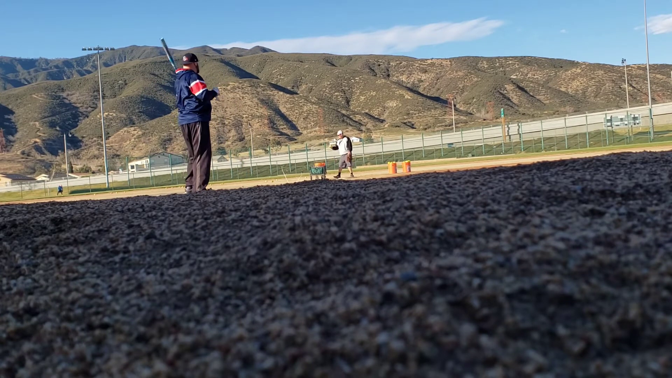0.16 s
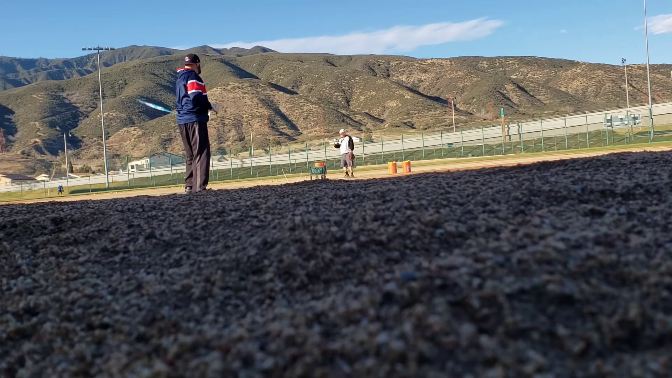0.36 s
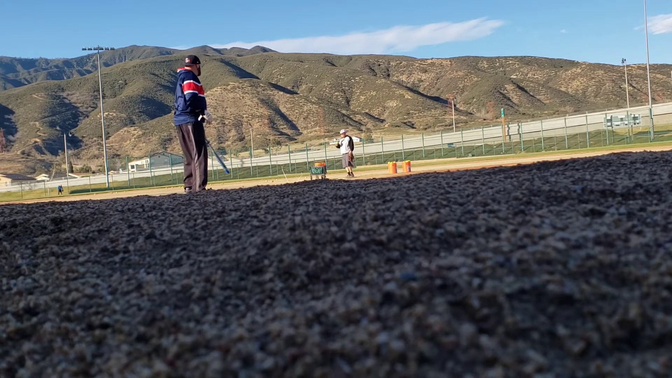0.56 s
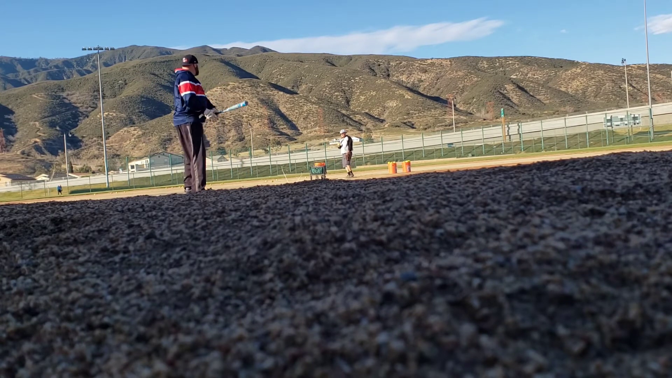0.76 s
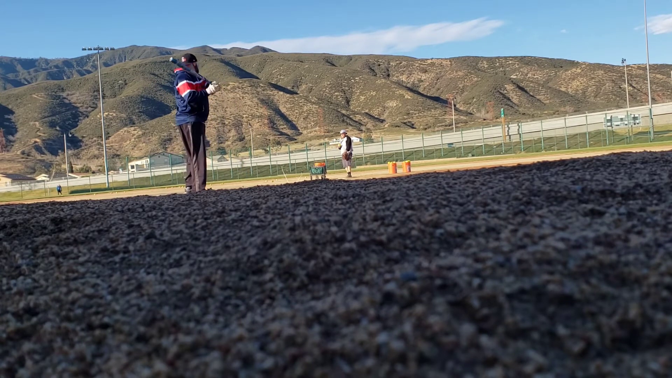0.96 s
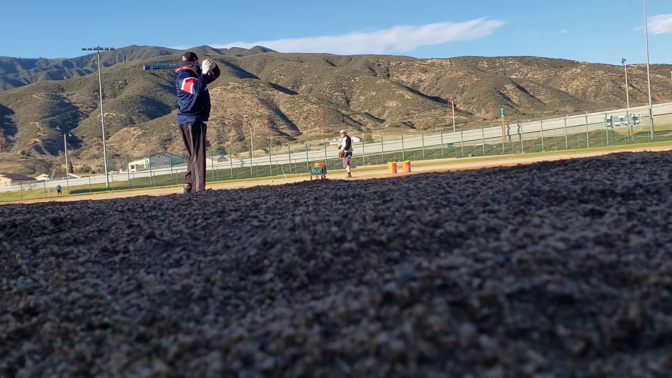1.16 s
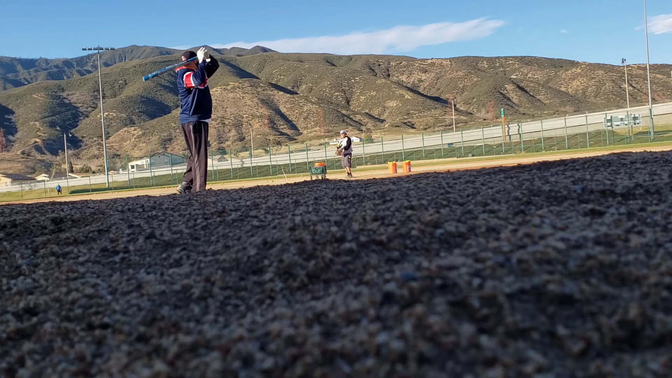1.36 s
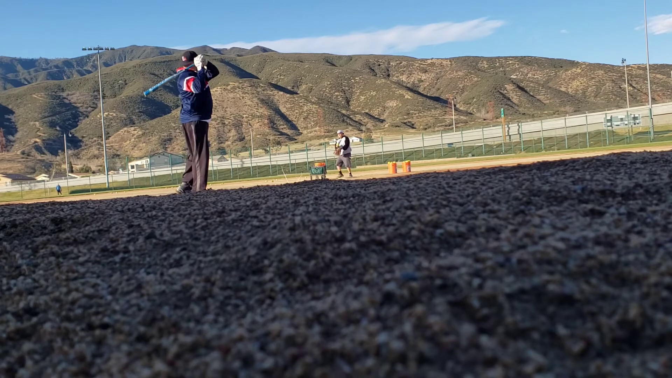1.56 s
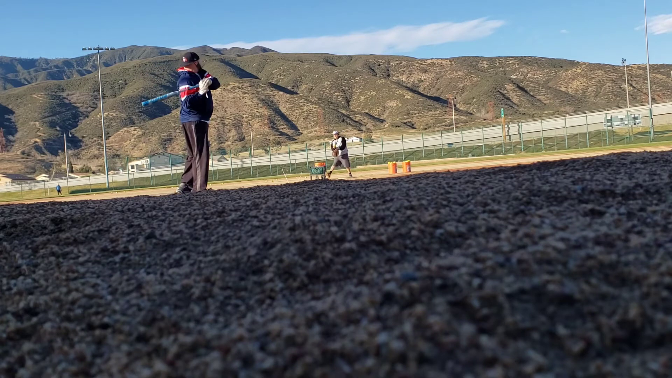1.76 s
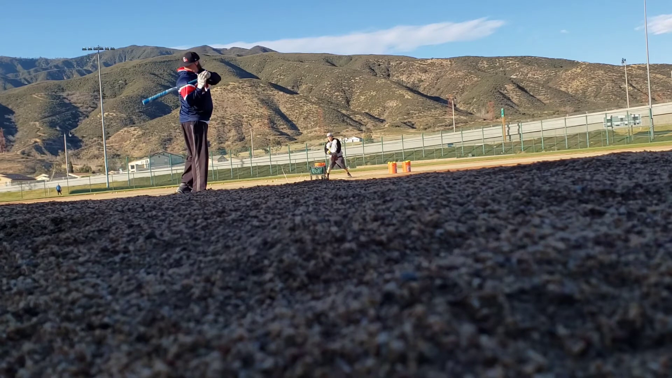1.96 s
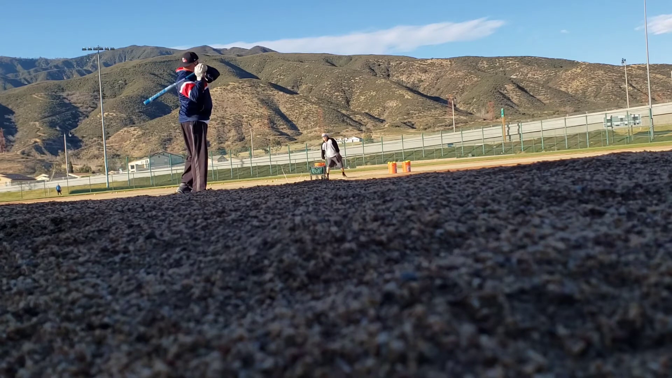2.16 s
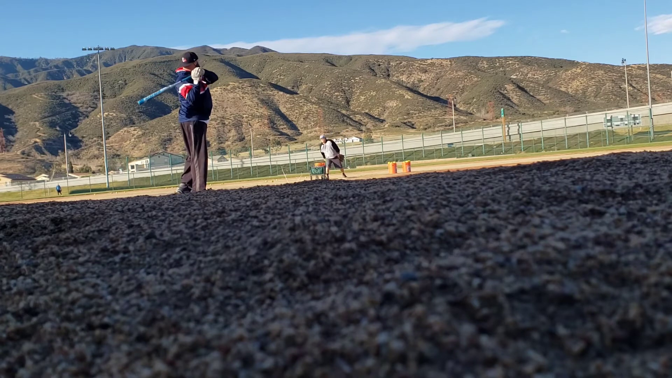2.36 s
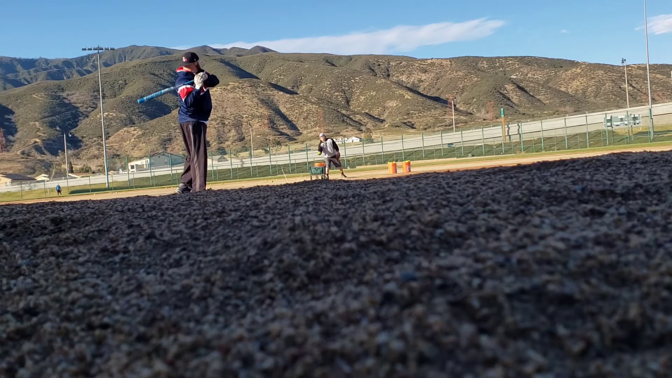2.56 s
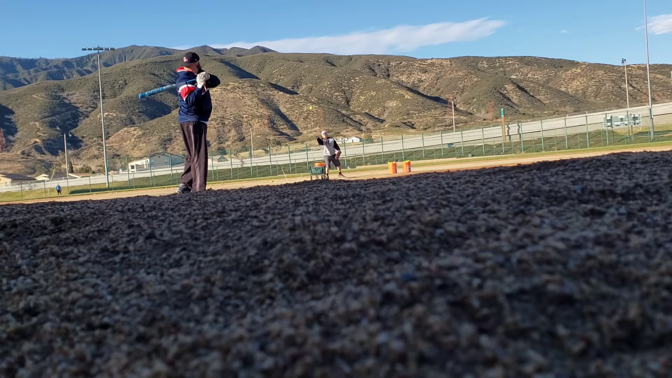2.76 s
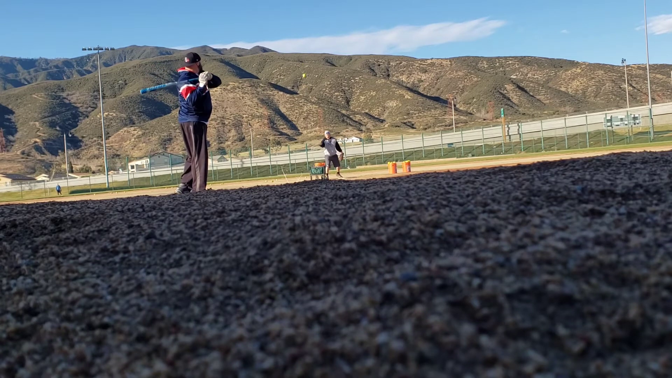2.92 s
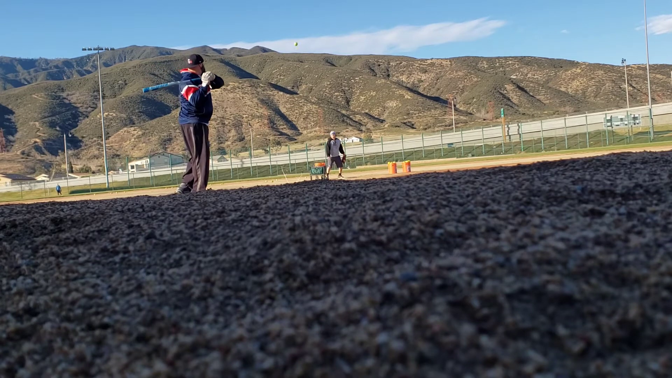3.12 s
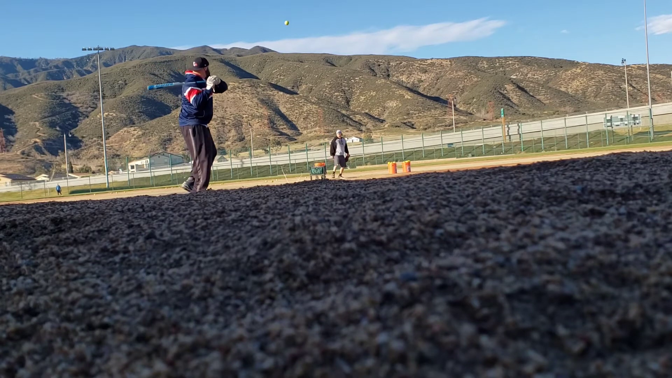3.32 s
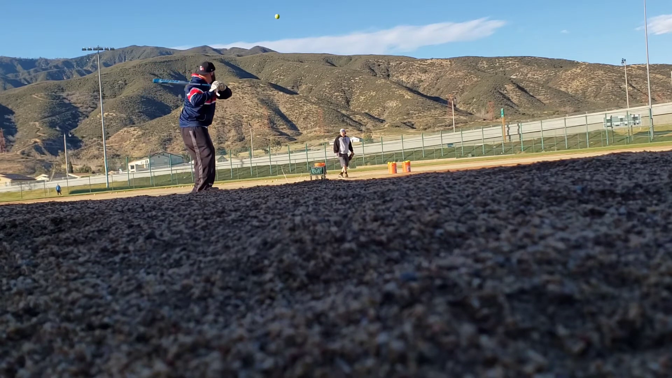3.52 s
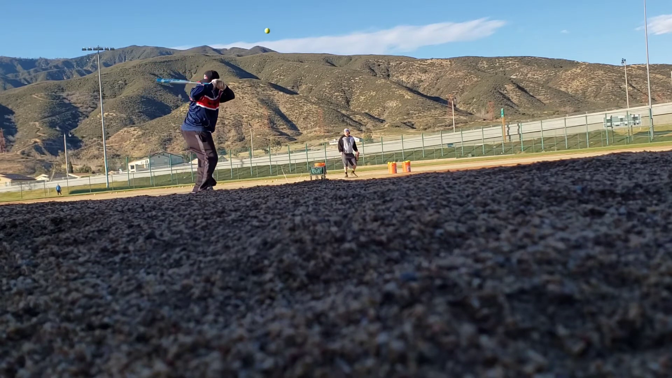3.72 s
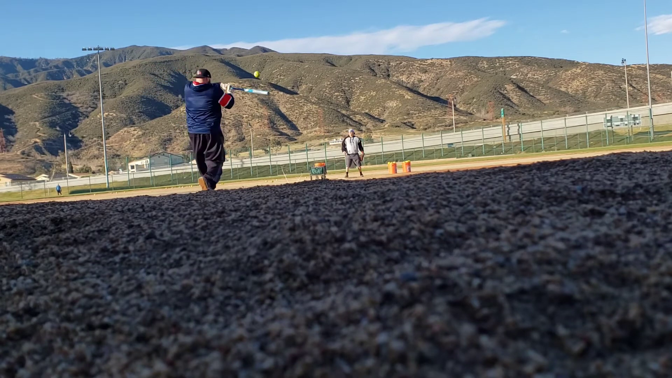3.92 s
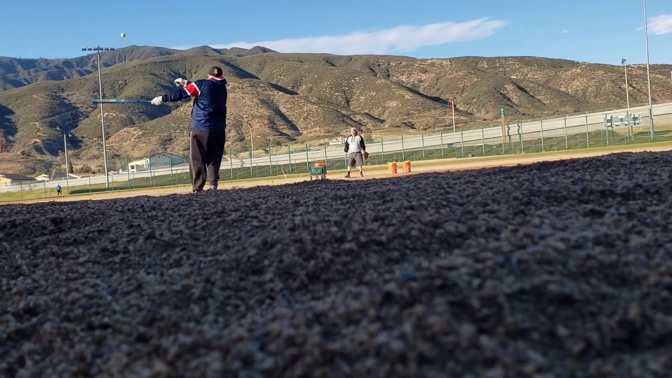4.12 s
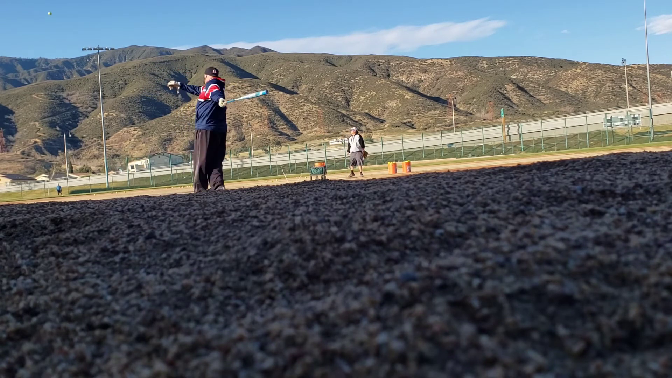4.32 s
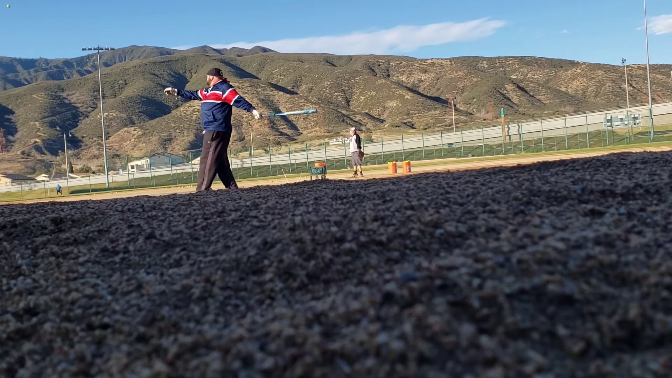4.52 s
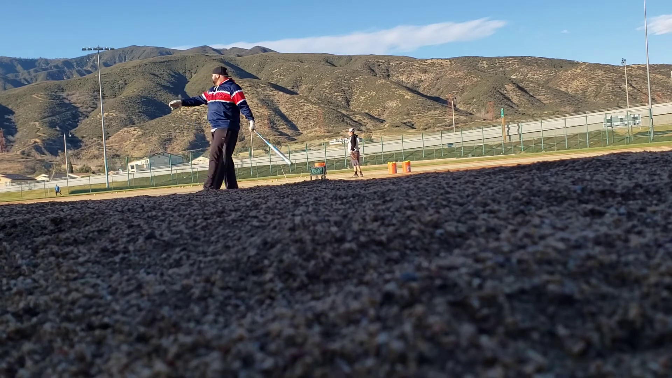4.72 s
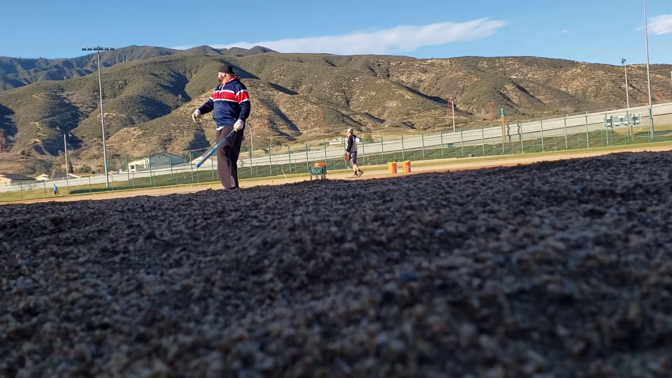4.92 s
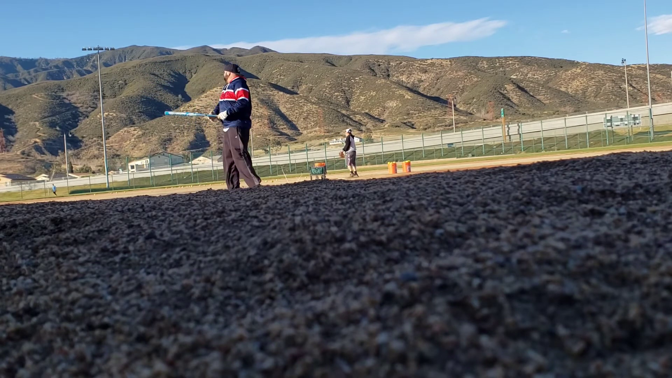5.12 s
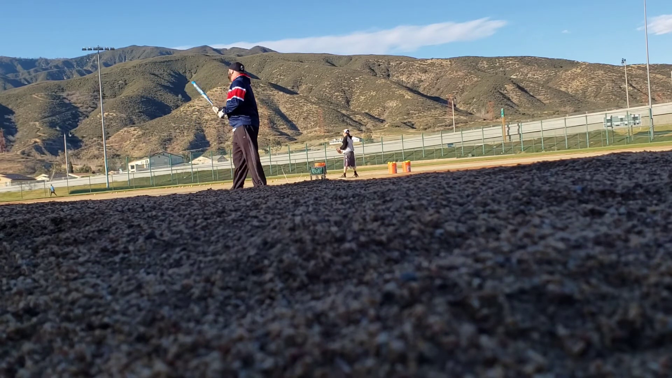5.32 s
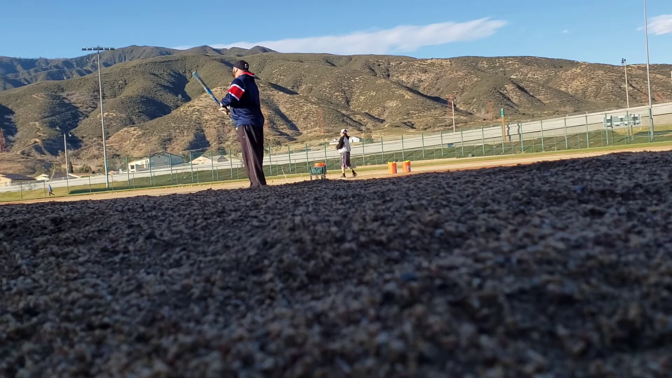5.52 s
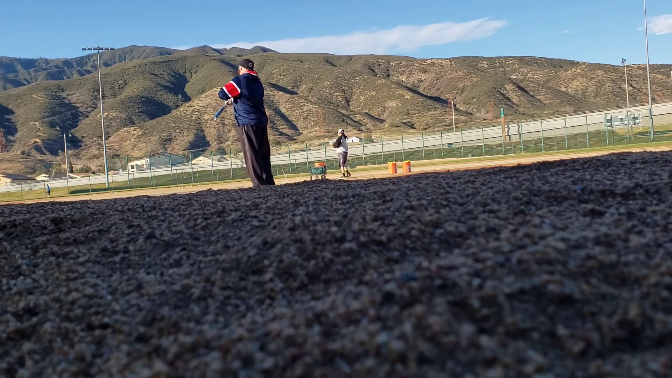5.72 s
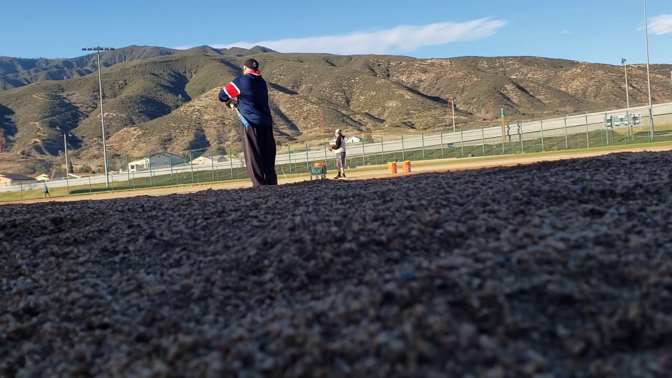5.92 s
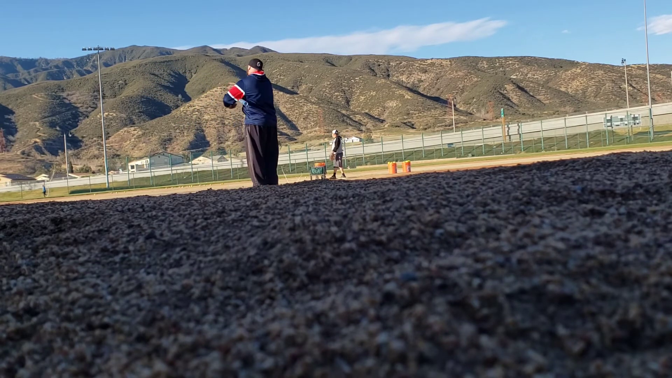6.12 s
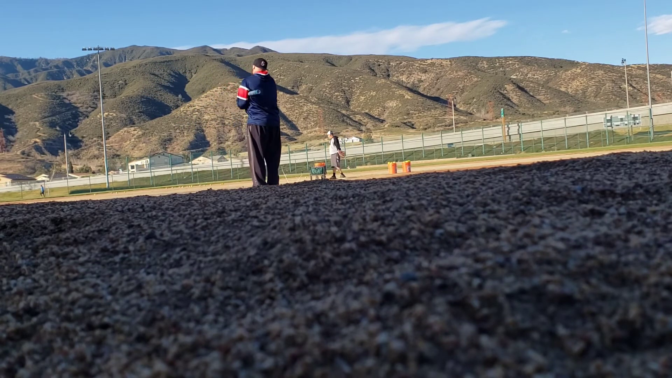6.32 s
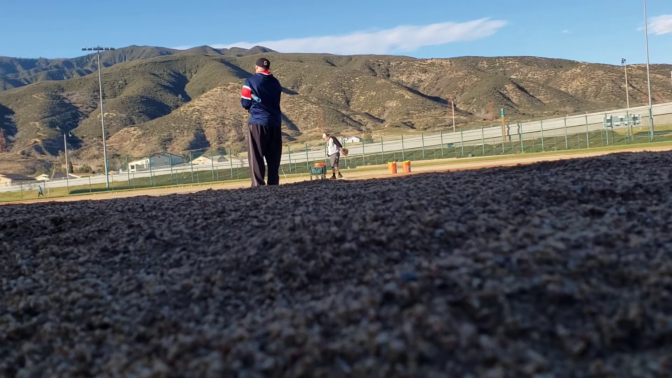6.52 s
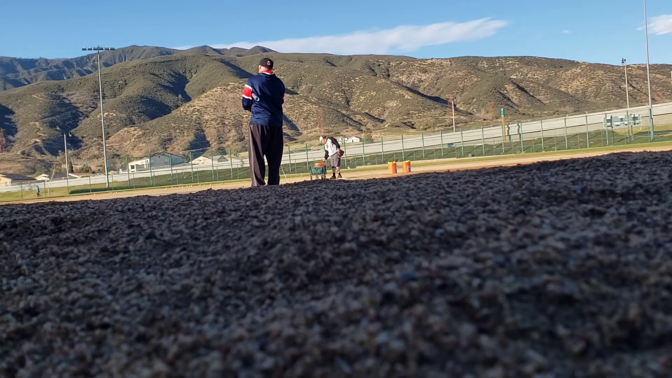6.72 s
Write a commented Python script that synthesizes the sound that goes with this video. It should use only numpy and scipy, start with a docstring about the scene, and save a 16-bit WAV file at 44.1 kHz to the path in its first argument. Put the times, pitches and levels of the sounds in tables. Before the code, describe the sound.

For the first three seconds there is only a quiet, steady low rumble of distant traffic with muffled tyre roar, faint hiss and wavering engine drone. A vehicle's tyre hum swells gently near 1.7 s, and a truck engine eases off around 2 s; brief engine notes surface at 2 and 2.9 s. From 2.9 to 3.9 s, soft low puffs of breeze buffet the microphone, stronger on the left. Shoes scrape gritty dirt at 3.3 s, with faint scuffs and jacket swish just before the blow. At 4.04 s a bat strikes the ball: one huge, dry metallic crack with a very short ping near 1.1 kHz, an immediate backstop slap, clattering fence returns, wall echoes around 4.65 s and a thin fading outdoor tail. The background is suddenly ducked; very faint cloth swishes reach 4.8 s. After about 6.1 s the rumble gradually rises again until 7 s.

```python
"""A bat meets a softball on an open field, heard on a two-port microphone on the ground behind the batter.
The barrel pings from ringing modes and a noise crack; a backstop one metre behind the microphone, posts,
slopes, a side fence and walls 100 m off answer. Shoes scuff and a jacket swishes as shaped noise.
Distant traffic is noise and low engine tones, with a truck easing off and a car cruising by; a breeze
puffs at the microphone, and the blow makes the gain control duck for about two seconds."""
import sys
import numpy as np
from scipy import signal
from scipy.fft import rfft, irfft, next_fast_len
from scipy.io import wavfile
from scipy.ndimage import uniform_filter1d, minimum_filter1d, map_coordinates

SR = 44100
rng = np.random.default_rng(int(sys.argv[2]) if len(sys.argv) > 2 else 0)


def master_out(mix):
    """Clip the mix to full scale and print it as 16-bit PCM to the path in sys.argv[1]."""
    frames = np.transpose(np.atleast_2d(mix))
    ceiling = np.clip(frames, -1, 1)
    pcm = np.round(ceiling * 32767).astype(np.int16)
    wavfile.write(sys.argv[1], SR, pcm)


N = 303408

# The two microphone ports under sound from all around.
# Each row: frequency in Hz, coherence between the ports (limited to 0..1 in use).
PORT_COHERENCE = [(35, 0.9), (65, 0.9), (130, 1.34), (290, 0.54), (480, 1), (750, .5), (1400, 0.56),
                  (3100, 0.06), (7000, -0.5)]
# Each row: frequency in Hz, phase by which the left port leads in radians.
PORT_LEAD = [(100, 0.5), (380, -0.38), (650, -2), (1250, -3), (1900, -6), (2500, -6), (3400, -8.5)]
# Each row: frequency in Hz, left level over right in dB.
PORT_BALANCE = [(35, 2), (70, 2), (200, 1.5), (700, 0), (2400, 0.5), (6500, 5), (15000, 0.5)]
# The microphone's own hiss. Each row: frequency in Hz, relative density in dB per Hz.
HISS_SPECTRUM = [(500, -10.5), (3000, 0.5), (5200, -0.5), (6500, 3), (7800, -4), (9200, -6.5), (12000, 1.5),
                 (14000, 1), (16000, -5.5)]

# Distant traffic: its rumble, its tyre roar, and the tyre hum of one vehicle.
# Each row: frequency in Hz, relative density in dB per Hz.
RUMBLE_SPECTRUM = [(20, -27.5), (30, -19.5), (40, -7), (62, 0), (85, -2.5), (120, -4.5), (160, -10.5),
                   (240, -16.5), (320, -26), (600, -50.5), (2000, -110)]
TYRE_SPECTRUM = [(120, -20.5), (300, -0.5), (430, -5), (560, 0.5), (800, -1.5), (1100, -7.5), (1500, -14),
                 (1900, -20), (2400, -29), (3100, -40), (4500, -56), (9000, -91)]
TREAD_SPECTRUM = [(200, -30), (350, -3), (430, -6), (520, 0), (640, -6), (850, -9), (1300, -30),
                  (3000, -70)]
BUSIEST_S, RUMBLE_DB, TYRES_DB = 2.4, -34, -47
THINNING_DB_PER_S = 0.63  # before and after the busiest moment
PASS_S, PASS_DB, PASS_WIDTH_S = 1.7, -53, .6  # the tyre hum: nearest moment, level then, half-width

# Engine orders of the truck and the car. Each row: multiple of the firing rate, relative level in dB.
TRUCK_ORDERS = [(1, -4.5), (2, 0.5), (3, -21.5)]
CAR_ORDERS = [(1, -1.5), (2, -11.5), (3, -22.5)]
EASE_OFF_S, SETTLE_S = 1.95, 0.42  # the truck eases off; time constant of its load
PULL_DB, COAST_DB = -40, -49.5  # under load and coasting, before the orders
TRUCK_HZ, CLIMB_HZ_PER_S, SAG_HZ_PER_S = 64.8, .6, .7  # firing rate at its top, rise before, fall after
CAR_HZ, CAR_NEAREST_S = 84, 4.7
CAR_DB, CAR_FADE_DB_PER_S = -39.5, 1.63  # level when nearest, before the orders; loss either side

# Notes of far engines. Each row: middle in seconds, pitch in Hz, level in dB,
# time either side to fall to 1/e in seconds.
SURGES = [(2.026, 380, -49.5, .09), (2.92, 236, -45, 0.093), (6.749, 118, -42, .39)]

# Puffs of breeze. Each row: middle in seconds, level in dB before the lee of the right port,
# time either side to fall to 1/e in seconds.
PUFFS = [(2.95, -38, .08), (3.12, -34.5, 0.089), (3.292, -36, 0.055), (3.57, -36, .04), (3.73, -31, .05),
         (3.84, -28.5, .055)]
# Their buffeting. Each row: frequency in Hz, relative density in dB per Hz.
BUFFET_SPECTRUM = [(15, -16), (30, -6.5), (48, 0), (75, -1), (110, -6.5), (170, -15.5), (260, -28),
                   (500, -50), (1500, -100)]
LEE_DB = -8.5  # the sheltered right port against the left

# What far walls, slopes, posts and rails, the side fence and the backstop return, and what survives
# a long way through the air. Each row: frequency in Hz, relative level in dB.
WALL_COLOUR = [(500, -11), (1080, -2.5), (1250, 1), (1550, -1), (2000, -11), (3500, -17), (7000, -24),
               (14000, -45)]
SLOPE_COLOUR = [(500, -6.5), (1100, 2.5), (1700, 3), (3000, 0), (4200, -14), (6500, -8.5), (7600, -4),
                (10000, -12), (16000, -22)]
POST_COLOUR = [(500, -14.5), (1100, -8.5), (2000, -2), (4000, 0), (5000, -7), (7500, -4), (10000, -11),
               (16000, -22)]
FENCE_COLOUR = [(500, -8), (1200, 0.5), (1800, -7), (3200, -2), (4300, -8), (7500, -14.5), (13000, -30)]
BACKSTOP_COLOUR = [(400, -4), (1100, -2.5), (1700, -5.5), (3500, -2.5), (7000, -0.5), (9500, 1),
                   (13000, -3.5)]
DISTANCE_COLOUR = [(500, -6), (1100, 3.5), (1700, 4), (3000, 0.5), (7500, -2), (10000, -9), (16000, -19.5)]
# Far walls, 100 and 111 m off. Each row: delay in seconds, level before colouring in dB.
WALL_ECHOES = [(.58, -38), (.648, -45.5)]
# Stretches of side fence, about 15 to 54 m off.
# Each row: delay in seconds, level before colouring in dB, pitch of the returned ping in Hz.
FENCE_ECHOES = [(.088, -37, 1183), (.114, -33, 1174), (.165, -36, 1156), (.184, -38, 1160),
                (.208, -40.5, 1195), (0.3133, -37, 1194)]
PING_DB, PING_T60 = -2.5, .16  # that ping's level among the bat modes, its decay time in s
# The crack as the field scatters it. Each row: frequency in Hz, relative density in dB per Hz.
FIELD_SPECTRUM = [(240, -21.5), (400, -8.5), (700, -4), (1130, -0.5), (1350, -3), (1730, -3), (2300, -9),
                  (4300, -13), (5000, -21), (7500, -19), (9000, -27), (12300, -22.5), (16000, -26)]
# How the field's answer dies. Each row: frequency in Hz, time to fall 60 dB in seconds.
FIELD_T60 = [(500, 0.38), (1100, 0.43), (1800, 0.36), (3000, 0.36), (7000, 0.36), (14000, 0.31)]

# Shoes scraping the dirt. Each row: peak in seconds, level in dB, time to fall 60 dB in seconds,
# level of the sand kicked up in dB.
SCUFFS = [(3.275, -65, 0.21, -80), (3.3, -56, 0.36, -63.5), (3.711, -69, 0.35, -72),
          (3.932, -67, .3, -80.5), (3.975, -61.5, .3, -73)]
# The jacket swishing with the arms.
# Each row: peak in seconds, level in dB, time to fall 60 dB in seconds.
RUSTLES = [(3.345, -62, .35), (3.41, -62.5, .42), (3.925, -58, 0.24), (3.943, -63, 0.17),
           (3.976, -58.5, .2), (4.03, -57.5, 0.14), (4.375, -57.5, .22), (4.425, -65, .1),
           (4.512, -62.5, .2), (4.585, -66.5, .3), (4.655, -69, .25), (4.71, -60.5, .17), (4.737, -65, .11),
           (4.765, -62, .24)]
# Grit under the shoes, fine sand, jacket cloth. Each row: frequency in Hz, relative density in dB per Hz.
DIRT_SPECTRUM = [(300, -29), (1200, -4.5), (2200, -2.5), (2800, -5.5), (3900, 2.5), (4800, -11),
                 (7500, -15), (9200, -26), (12500, -24.5), (16000, -29)]
SAND_SPECTRUM = [(1500, -20), (3000, -3), (4000, 3), (4800, -7), (7500, -0.5), (9200, -12), (12500, -7),
                 (16000, -16)]
CLOTH_SPECTRUM = [(400, -10.5), (1300, 2.5), (2200, 4.5), (3200, -1.5), (4000, -6.5), (4600, -23),
                  (7500, -24), (10000, -40)]
SAND_FALL_S = .022  # the sand lands this long after the scrape
SCUFF_RISE, RUSTLE_RISE = 0.071, 0.15  # build-up as a share of the decay time

# The blow: hoop mode of the barrel, short pop of the ball, higher barrel modes, contact click, low thump.
# Each row: frequency in Hz, relative level in dB, time to fall 60 dB in seconds.
BAT_MODES = [(1095.6, -2.5, 0.053), (1105, 5.5, .0062), (1660, 1.47, .0052), (2676, -25, 0.034),
             (3190, -29.5, 0.043), (3852, -28, 0.035), (4135, -15.5, .009), (6560, -20.5, 0.013),
             (7607, -29.5, 0.045), (8900, -20, .003), (13610, -6, 0.0032), (228, -31, 0.018)]
HIT_S = 4.0407  # the moment of contact

TOP_HZ = 16000  # upper band limit


def amp(db):
    """Amplitude for a level in dB."""
    return 10 ** (np.asarray(db) / 20)


def unit(x):
    """x scaled to rms 1."""
    return x / np.sqrt(np.mean(x ** 2) + 1e-20)


def clock():
    """The time of every sample in seconds."""
    return np.arange(N) / SR


def along(points, hz):
    """Values of (Hz, value) points, interpolated on a log frequency axis."""
    f, v = np.transpose(points)
    return np.interp(np.log(hz + 1), np.log(f + 1), v)


def wobble(rate):
    """A smooth random curve, rate knots a second."""
    knots = rng.standard_normal(int(N * rate / SR) + 4)
    return map_coordinates(knots, [clock() * rate])


def filtered(x, response):
    """x times a complex response of frequency."""
    m = next_fast_len(N + SR // 2)
    return irfft(rfft(x, m) * response(np.fft.rfftfreq(m, 1 / SR)), m)[..., :N]


def rush(spectrum):
    """Noise of rms 1 from all around: shared and opposed parts set how alike the ports are."""
    half = np.array([[.5], [-.5]])

    def blend(hz):
        turn = np.arccos(np.clip(along(PORT_COHERENCE, hz), 0, 1)) / 2
        return amp(along(spectrum, hz)) * [np.cos(turn), np.sin(turn)]

    def ports(hz):
        return amp(half * along(PORT_BALANCE, hz)) * np.exp(1j * half * along(PORT_LEAD, hz))

    mid, side = filtered(rng.standard_normal((2, N)), blend)
    return unit(filtered(np.array([mid + side, mid - side]), ports))


def fade(t, t60):
    """Exponential decay from t = 0 on."""
    return np.exp(-np.log(1000) * np.maximum(t, 0) / t60)


def swell(s, rise, t60):
    """An envelope that climbs to 1 at time s and dies away."""
    t = clock() - s
    return np.clip(1 + t / rise, 0, 1) * fade(t, t60)


def puff(s, width):
    """A bell-shaped envelope around time s, down to 1/e at width either side."""
    return np.exp(-((clock() - s) / width) ** 2)


def arrival(blow, colour, delay, skew):
    """The blow by one path: coloured, late, and at the left port skew seconds before the right."""
    lag = delay + skew * np.array([[-.5], [.5]])
    return filtered(blow, lambda hz: amp(along(colour, hz)) * np.exp(-2j * np.pi * hz * lag))


def microphone_hiss():
    """The microphone's own steady noise."""
    return amp(-79.5) * rush(HISS_SPECTRUM)


def engine(hz, db, orders, drift):
    """A far engine: only its lowest orders carry, wavering in pitch and level."""
    phase = 2 * np.pi * np.cumsum(hz * (1 + drift * wobble(6))) / SR
    tones = 0
    for k, level in orders:
        wavering = amp(db + level + 2.8 * wobble(5))
        tones = tones + wavering * np.sin(k * phase + rng.uniform(0, 2 * np.pi))
    return np.sqrt(2) * tones


def surges():
    """Now and then one wavering note of a far engine carries over the traffic."""
    return sum(engine(hz, db, [(1, 0)], drift=.025) * puff(s, width) for s, hz, db, width in SURGES)


def passing():
    """One vehicle's tyre hum rises over the rest and sinks back."""
    return amp(PASS_DB) * rush(TREAD_SPECTRUM) / (1 + ((clock() - PASS_S) / PASS_WIDTH_S) ** 2)


def truck():
    """The engine gains speed under load, then eases off: it goes quiet and slowly runs down."""
    before = np.maximum(EASE_OFF_S - clock(), 0)
    after = np.maximum(clock() - EASE_OFF_S, 0)
    hz = TRUCK_HZ - CLIMB_HZ_PER_S * before - SAG_HZ_PER_S * after
    load = np.exp(-after / SETTLE_S)
    return engine(hz, COAST_DB + (PULL_DB - COAST_DB) * load, TRUCK_ORDERS, drift=.005)


def car():
    """An engine at cruising speed, loudest where it is nearest."""
    db = CAR_DB - CAR_FADE_DB_PER_S * np.abs(clock() - CAR_NEAREST_S)
    return engine(CAR_HZ, db, CAR_ORDERS, drift=0.0203)


def traffic():
    """Rumble and tyre roar swell and ebb together, joined by single vehicles."""
    flow_db = -THINNING_DB_PER_S * np.abs(clock() - BUSIEST_S)
    rumble = amp(RUMBLE_DB + flow_db + 0.81 * wobble(5.0)) * rush(RUMBLE_SPECTRUM)
    tyres = amp(TYRES_DB + flow_db + 0.62 * wobble(4.3)) * rush(TYRE_SPECTRUM)
    return rumble + tyres + truck() + car() + passing() + surges()


def breeze():
    """Each puff tumbles over the two ports separately, and hardest over the left."""
    force = sum(amp(db) * puff(s, width) for s, db, width in PUFFS)
    eddies = unit(filtered(rng.standard_normal((2, N)), lambda hz: amp(along(BUFFET_SPECTRUM, hz))))
    return force * amp([[0], [LEE_DB]]) * eddies


def diffuse(blow, rise, t60, clumps_db):
    """Countless weak reflections in uneven clumps, different at each port."""
    t = clock()[:SR]
    envelope = np.minimum(t / rise, 1) * fade(t, t60) * amp(clumps_db * wobble(40)[:SR])
    tail = rng.standard_normal((2, SR)) * envelope
    return signal.fftconvolve(blow, tail / np.linalg.norm(tail[0]), axes=1)[:, :N]


def far_walls(blow):
    """Each far wall returns the blow once, with a short blur after it."""
    walls = sum(amp(db) * arrival(blow, WALL_COLOUR, delay=s, skew=0) for s, db in WALL_ECHOES)
    return walls + diffuse(walls, rise=.003, t60=0.06, clumps_db=4.5)


def turbulent(x, jitter):
    """Moving air varies the travel time by about jitter seconds, so a far ring wavers and breaks up."""
    return np.array([map_coordinates(port, [(clock() + jitter * wobble(45)) * SR]) for port in x])


def slopes(blow):
    """The slopes around the field, from 12 m out, return a long diffuse tail through moving air."""
    tail = diffuse(blow, rise=.05, t60=3.2, clumps_db=2.0)
    return turbulent(amp(-34.5) * arrival(tail, SLOPE_COLOUR, delay=0.072, skew=0), jitter=.0003)


def fence():
    """The ping thrown sideways returns from stretch after stretch of fence, left port first."""
    returns = 0
    for s, db, hz in FENCE_ECHOES:
        modes = [(hz, PING_DB, PING_T60)] + BAT_MODES[1:]
        ping = bat(modes, level_db=5.5, crack_db=-11, crack_t60=.012, contact=.00008)
        returns = returns + amp(db) * np.pad(ping, ((0, 0), (int(s * SR), 0)))[:, :N]
    return arrival(returns, FENCE_COLOUR, delay=0, skew=0.00048)


def posts(blow, spread, t60, count):
    """Scattered posts and rails each send back one slap, generally weaker the farther they stand."""
    places, sizes, sides = rng.random((3, count))
    delays = spread * (np.arange(count) + 1 + places) / count
    taps = np.zeros((2, SR))
    for s, size, side in zip(delays, sizes, sides):
        port_times = s + .0005 * (side - .5) * np.array([-1, 1])
        at = np.clip(port_times * SR, 0, SR - 1).astype(int)
        taps[[0, 1], at] += (.5 + size) * fade(s, t60)
    return arrival(signal.fftconvolve(blow, taps, axes=1)[:, :N], POST_COLOUR, delay=0, skew=0)


def field(near_db, near_t60, scatter_db, late_db, late_t60):
    """Ground and fences scatter the crack into a short wash; a duller one lingers from farther out."""
    hz, t, z = signal.stft(rush(FIELD_SPECTRUM), SR, nperseg=256)
    decay = fade(t - HIT_S, along(FIELD_T60, hz)[:, None])  # each band dies at its own rate
    scatter = signal.istft(z * decay, SR, nperseg=256)[1][:, :N]
    arrived = np.clip((clock() - HIT_S) / 0.0032, 0, 1)
    near = amp(near_db) * swell(HIT_S + 0.0074, 0.0043, near_t60) * rush(FIELD_SPECTRUM)
    far_noise = filtered(rush(FIELD_SPECTRUM), lambda hz: amp(along(DISTANCE_COLOUR, hz)))
    late = amp(late_db) * swell(HIT_S + .12, .08, late_t60) * far_noise
    return near + amp(2.4 * wobble(160)) * (amp(scatter_db) * arrived * scatter + late)


def grains(per_s, spread_db):
    """Gain, rms 1, of stones catching one by one, each dying 60 dB in 8 ms."""
    snaps = (rng.random(N) < per_s / SR) * amp(spread_db * rng.standard_normal(N))
    return unit(signal.fftconvolve(snaps, fade(clock()[:SR // 50], .008))[:N])


def strokes(rows, rise_share, rough_db):
    """The level of rubbing: each stroke builds up and dies away, catching and slipping as it goes."""
    level = sum(amp(db) * swell(s, rise_share * length, length) for s, db, length in rows)
    return level * amp(rough_db * wobble(250))


def batter():
    """Grit slips and crunches under the soles and sprays fine sand; the jacket swishes with the arms."""
    crunch = unit(1 + grains(per_s=300, spread_db=4))
    scrapes = [row[:3] for row in SCUFFS]
    shoes = strokes(scrapes, SCUFF_RISE, rough_db=1.35) * crunch * rush(DIRT_SPECTRUM)
    spray = [(s + SAND_FALL_S, sand_db, length) for s, db, length, sand_db in SCUFFS]
    sand = strokes(spray, rise_share=.11, rough_db=0.9) * rush(SAND_SPECTRUM)
    jacket = strokes(RUSTLES, RUSTLE_RISE, rough_db=1.7) * rush(CLOTH_SPECTRUM)
    return shoes + sand + jacket


def bat(modes, level_db, crack_db, crack_t60, contact):
    """The ball pops against the barrel, whose hoop mode rings on after the noisy crack."""
    t = np.maximum(clock() - HIT_S, 0)
    ring = 0
    for k, (hz, db, t60) in enumerate(modes):
        ring = ring + (-1) ** k * amp(db) * np.sin(2 * np.pi * hz * t) * fade(t, t60)
    crack = amp(crack_db) * rng.standard_normal((1, N)) * fade(t, crack_t60)
    onset = 1 - np.exp(-t / contact)  # silent until contact
    return amp(level_db) * (ring + crack) * onset


def scene():
    """The traffic and the breeze, the batter's movements, the hit and its reflections."""
    background = microphone_hiss() + traffic() + breeze()
    blow = bat(BAT_MODES, level_db=6.0, crack_db=-17, crack_t60=.007, contact=.00008)
    slaps = amp(-25) * posts(blow, spread=.36, t60=.55, count=20)
    wash = field(near_db=-18.0, near_t60=0.065, scatter_db=-24.0, late_db=-55.5, late_t60=2.0)
    answers = far_walls(blow) + slopes(blow) + fence() + slaps + wash
    backstop = arrival(blow, BACKSTOP_COLOUR, delay=.00558, skew=.000113)
    direct = arrival(blow, [(1000, 0)], delay=0, skew=.000062)  # uncoloured
    return background + answers + batter() + backstop + direct


def gain_control(x, limit_db, hold, release_db):
    """Gain drops at once on a loud sound, holds, then climbs back at release_db a second."""
    power = np.abs(uniform_filter1d(np.mean(x ** 2, axis=0), size=256))
    excess_db = np.maximum(10 * np.log10(power + 1e-12) - limit_db, 0)
    width = int(hold * SR) // 2 * 2 + 1
    # the largest excess of the last hold seconds
    held = -minimum_filter1d(-excess_db, width, origin=width // 2, mode="constant")
    climb = release_db * clock()
    return x * amp(climb - np.maximum.accumulate(held + climb))


def record(dry):
    """The gain control ducks, peaks clip just under full scale, and the top is cut at the band limit."""
    ducked = gain_control(dry, limit_db=-9.0, hold=2.08, release_db=7.5)
    eased = np.clip(ducked, -.92, .92) * signal.windows.tukey(N, .0005)  # brief fades at both ends
    return filtered(eased, lambda hz: 1 / (1 + (hz / TOP_HZ) ** 120))


dry = scene()
out = record(dry)
master_out(out)
```